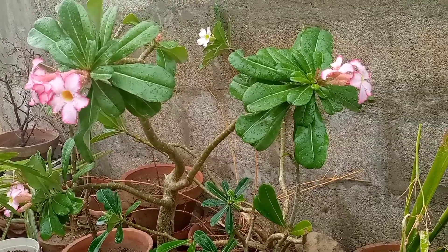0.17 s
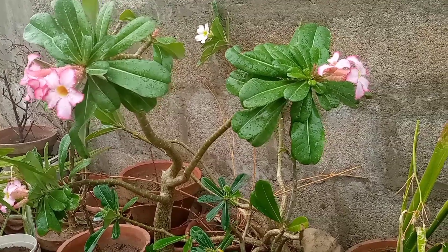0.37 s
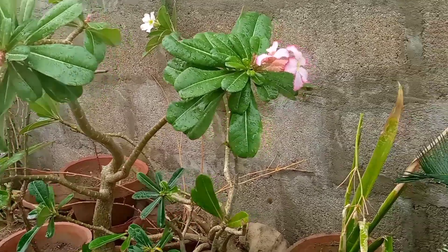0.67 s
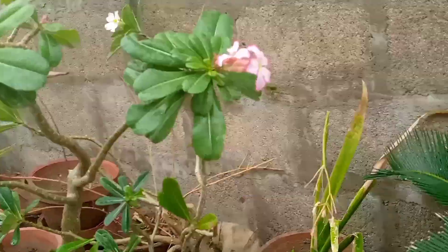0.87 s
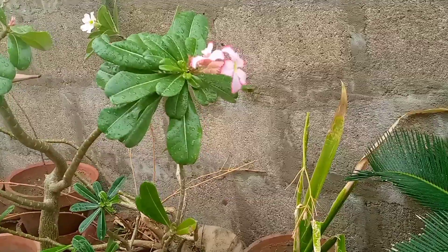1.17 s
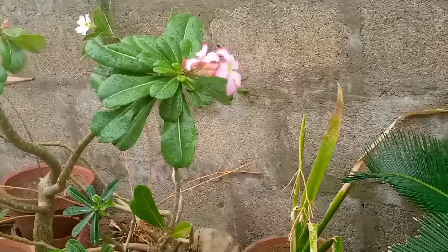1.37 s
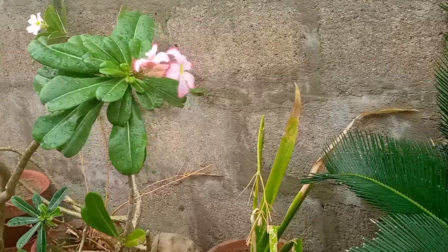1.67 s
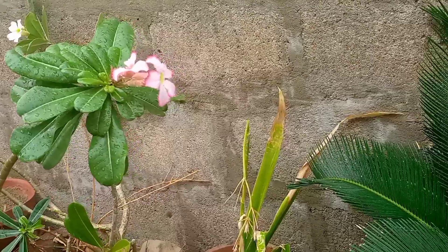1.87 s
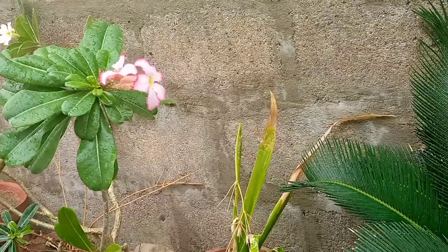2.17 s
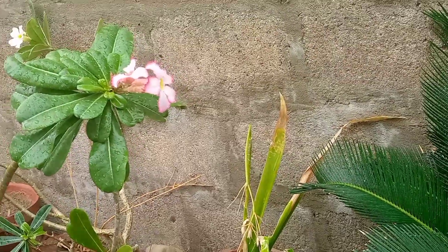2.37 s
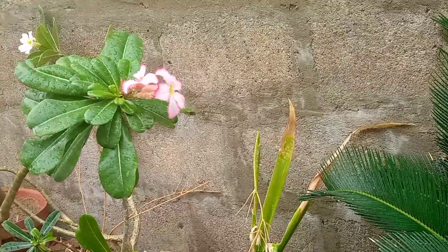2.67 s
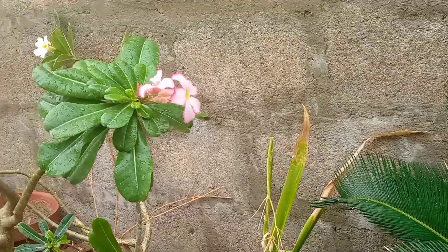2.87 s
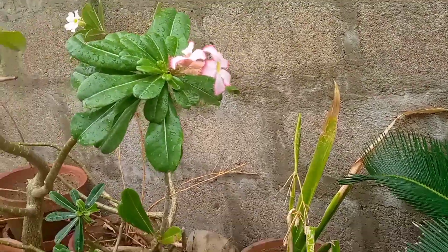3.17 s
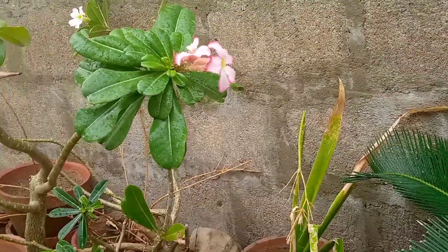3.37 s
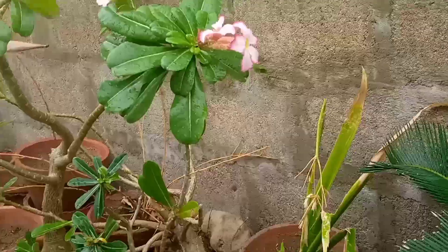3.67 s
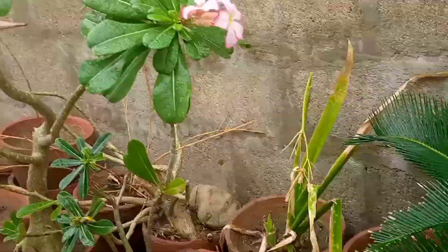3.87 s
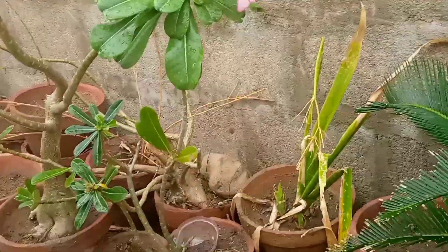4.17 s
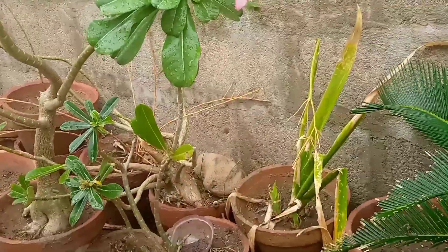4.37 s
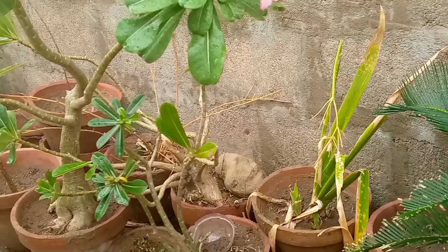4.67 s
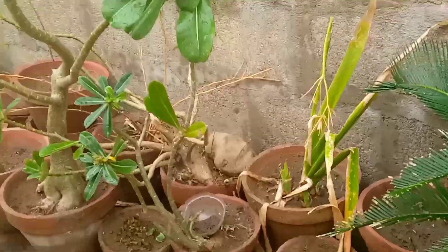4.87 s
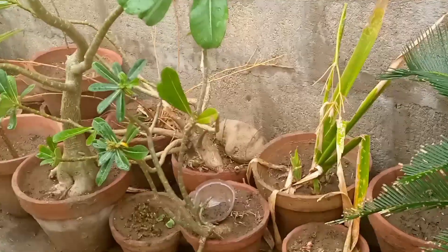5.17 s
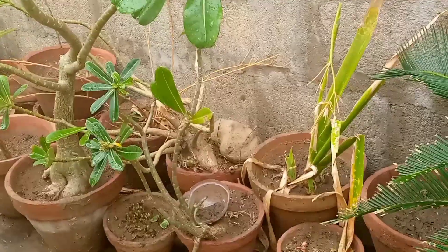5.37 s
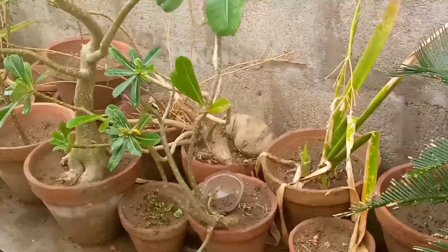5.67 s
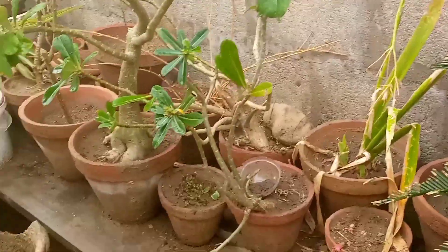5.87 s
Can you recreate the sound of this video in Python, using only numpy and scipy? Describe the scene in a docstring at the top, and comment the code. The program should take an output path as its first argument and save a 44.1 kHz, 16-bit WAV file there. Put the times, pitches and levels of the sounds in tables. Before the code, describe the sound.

In a walled courtyard of potted plants, a rooster gives short rough syllables and then one long sagging crow. Hoarse fowl squawks follow, with thin bird chirps. Small dry ticks sound near the microphone through the middle. A dog woofs once, then a second crow rises with another rooster overlapping it, its long last note still sounding at the end. Quiet hush and low rumble lie beneath.

```python
"""Roosters crow twice beyond the walls of a home courtyard, a second bird overlapping the later crow.
Each crow is a stack of harmonics on a rough, gliding pitch, echoing round the yard.
Pulses ring a throat for hoarse squawks; fluttering whistles make chirps, tonal streaks of squawks and
faint upper lines of the second crow; a falling voice makes one short woof of a dog. Small dry ticks of
ringing noise sound close by, over a quiet outdoor hush and a low rumble of filtered noise."""
import sys
import numpy as np
from scipy import signal
from scipy.fft import rfft, irfft, next_fast_len
from scipy.io import wavfile
from scipy.ndimage import uniform_filter1d

SR = 44100
rng = np.random.default_rng(int(sys.argv[2]) if len(sys.argv) > 2 else 0)


def wav_out(sig):
    """Save sig, one row per channel (or a flat mono array), as 16-bit PCM at SR to the path in sys.argv[1]."""
    wavfile.write(sys.argv[1], SR, np.round(np.clip(np.atleast_2d(sig).T, -1, 1) * 32767).astype(np.int16))


N = 265173
TIME = np.arange(N) / SR


def phrase(rooster, *held):
    """Slurs one rooster's notes together; the strongest note sets pitch and roughness."""
    # short crow syllables: t/s, length/s, start f/Hz, middle f/Hz, end f/Hz, harmonic 1 level/dB,
    # harmonic 2 level/dB, harmonic 3 level/dB, tilt over the syllable/dB, roughness (0-1), rooster
    syllables = [ (0.165, 0.12, 777, 829, 863, -43, -45, -59, -0.5, 0.57, "first"),
                 (0.369, 0.13, 882, 880, 850, -41, -44.5, -76, -7, 0.5, "first"),
                 (0.572, .075, 875, 857.6, 859.5, -43, -41, -65, 0, 0.26, "first"),
                 (0.678, 0.058, 840, 845, 821, -43, -56, -65, -1.5, 0.59, "first"),
                 (1.825, 0.12, 762, 754, 743.4, -36, -47.5, -62, 1.5, 0.11, "first"),
                 (1.992, .13, 694, 689, 628, -46, -56, -68, 5.5, 0.57, "first"),
                 (4.34, 0.12, 667, 631, 642.3, -48.5, -54, -51.5, 7, 0.54, "second"),
                 (4.51, 0.092, 671.3, 717.4, 790.5, -34.5, -40.5, -39.5, 7, 0.51, "second"),
                 (4.625, 0.038, 770, 730, 705, -35, -49, -52, -3.5, 0.45, "second"),
                 (4.678, 0.093, 723, 655.3, 636, -43.5, -59, -50, -6, 0.68, "second"),
                 (4.83, 0.071, 682.4, 714, 765, -40, -34, -40.5, 4, .5, "second"),
                 (4.941, .075, 699, 711, 748, -37, -36, -41, 2, 0.37, "second"),
                 (5.039, 0.054, 711, 701, 684, -33.5, -39, -48, -4.5, 0.52, "second"),
                 (5.142, 0.15, 686.4, 693.6, 616, -53, -47, -49.5, 3.5, 0.98, "second"),
                 (4.61, 0.21, 843.4, 845.7, 838.3, -35.5, -38, -41, -7.5, 0.62, "answer"),
                 (4.815, 0.16, 833.6, 828, 836, -35.5, -52, -52, -1, 0.77, "answer"),
                 (5.031, 0.22, 827, 801, 816, -38.5, -52.5, -67, -13, 0.9, "answer")]
    slur_s = .016
    notes = [syllable(*row[:-1]) for row in syllables if row[-1] == rooster] + list(held)
    hz, rough, levels_db = (np.array(control) for control in zip(*notes))
    lead = levels_db.max(1).argmax(0)
    lead_hz = hz[lead, np.arange(N)]
    lead_rough = np.clip(rough[lead], 0, 1)
    slur = lambda x: uniform_filter1d(x, int(slur_s * SR))
    return slur(lead_hz), slur(lead_rough), np.maximum(levels_db.max(0), -100)


def syllable(start, length, start_hz, middle_hz, end_hz, db1, db2, db3, tilt_db, rough):
    """Controls of a short harsh note: the pitch bends once while the level tilts."""
    progress = np.clip((TIME - start) / length, 0, 1)
    hz = np.interp(progress, [0, .5, 1], [start_hz, middle_hz, end_hz])
    level_db = swell_db(start, start + length) + tilt_db * (progress - .5)
    return hz, rough, np.add.outer([db1, db2, db3], level_db)


def long_note(hold, fading):
    """Controls of the held note: a scoop up to pitch, then a steady sag as the breath runs out."""
    scoop_s = .045  # time constant
    hz, scoop_hz, sag_hz_per_s, rough, third_db = hold
    start, end = fading[0][0], fading[-1][0]
    t = np.maximum(TIME - start, 0)
    db1, db2 = curves(fading)
    levels_db = np.array([db1, db2, db2 + third_db]) + swell_db(start, end)
    return hz - scoop_hz * np.exp(-t / scoop_s) - sag_hz_per_s * t, rough, levels_db


def swell_db(start, end):
    """Attack before a note's start, hold, release after its end, at the same speeds for every note."""
    attack_db_per_s, release_db_per_s = 375, 328.5
    attack_db = attack_db_per_s * np.maximum(start - TIME, 0)
    release_db = release_db_per_s * np.maximum(TIME - end, 0)
    return -attack_db - release_db


def crow(controls, upper, jitter, rasp, wet_db, upper_db, breath_db):
    """A stack of harmonics on a jittering pitch; the walls smear each glide."""
    press_db = 8  # the upper harmonics brighten by this much at full roughness
    hz, rough, levels_db = controls
    sounding = uniform_filter1d(1. * (levels_db.max(0) > -70), SR // 50)
    phase = 2 * np.pi * np.cumsum(hz * (1 + jitter * rough * wander(111.0))) / SR
    pressure = sounding * (1 + rasp * rough * wander(62))
    low = np.zeros(N)
    for k, db in enumerate(levels_db, 1):
        low += amp(db) * steady(yard(pressure * np.cos(k * phase), wet_db), 0.091)
    # weak upper harmonics and the breath of the harsh parts follow the overall effort
    effort_db = uniform_filter1d(np.mean(levels_db[:2], 0), SR // 8)
    high = np.zeros(N)
    for k in range(len(levels_db) + 1, 10):
        harmonic_db = effort_db + upper_db + press_db * rough + at_hz(upper, k * hz)
        high += amp(harmonic_db) * np.cos(k * phase)
    breath = amp(effort_db + breath_db) * rough * resonance(rng.standard_normal(N), 1990, 1400)
    return low * sounding + yard(pressure * (high + breath), wet_db=5)


def squawks(pulse_hz, jitter, breath):
    """Slow uneven pulses and turbulence ring a narrow throat."""
    # hoarse squawks: t/s, lower throat level/dB before its lift, upper throat level/dB
    calls = [
        [(0.0, -70, -56.5), (0.19, -58.5, -43), (0.32, -96, -63)],
        [(1.85, -91, -53), (2.144, -54, -45), (2.21, -54.5, -72), (2.24, -49.5, -43), (2.468, -62.5, -43),
         (2.75, -97, -65.5)],
    ]
    low_lift_db = 6
    # throat resonances, lower and upper: f/Hz, width/Hz, level/dB within the group
    throat_low = [(1291, 215, 0)]
    throat_high = [(1560, 190, -5), (1790, 220, -1), (1990, 130, 0), (1850, 1000, -6)]
    turns = np.cumsum(pulse_hz * (1 + jitter * wander(70))) / SR
    pulses = unit(np.diff(np.floor(turns), prepend=0))
    drive = pulses + breath * rng.standard_normal(N)

    def ring(throat):
        """Rings one group of throat resonances at an even level."""
        return steady(unit(sum(amp(db) * resonance(drive, hz, width) for hz, width, db in throat)), 0.05)

    low, high = ring(throat_low), ring(throat_high)
    out = np.zeros(N)
    for rows in calls:
        low_db, high_db = curves(rows)
        out += gate(rows) * (amp(low_db + low_lift_db) * low + amp(high_db) * high)
    return out


def whistled_lines(flutter_hz, side_db, far_side_db, near_above_db, twitter_per_s):
    """Fluttering whistles, the loud ones richer in overtones; more birds twitter faintly behind."""
    # whistled lines: t/s, length/s, start f/Hz, end f/Hz, level/dB rms, flutter (share of the pitch)
    # mostly chirps; the rows at 1.887, 5.795, 5.878 and 5.905 s are tonal streaks of hoarse fowl squawks,
    # those at 4.236 and 4.37 s upper harmonics of the second rooster's crow, as faint whistling lines
    lines = [ (0, 0.029, 6400, 5900, -50, 0.14), (.63, 0.099, 3370, 3790, -54, 0.096),
             (0.662, 0.077, 4550, 4480, -53, 0.013), (0.738, 0.076, 3450, 2805, -53.5, 0.066),
             (1.025, 0.033, 5830, 4920, -37, 0.034), (1.043, 0.02, 5565, 5620, -29.5, 0.037),
             (1.133, 0.024, 6430, 4650, -41, 0.058), (1.142, 0.068, 6990, 6450, -47, 0.066),
             (1.128, 0.1, 2975, 3130, -56.5, 0.024), (1.765, 0.072, 7350, 7220, -56, 0.016),
             (1.878, 0.12, 6350, 4320, -53, 0.11), (1.887, 0.17, 2012, 2024, -49.5, 0.017),
             (2.798, 0.087, 5860, 5760, -53.5, .02), (3.042, .09, 7200, 7000, -53, 0.03),
             (3.06, .07, 3600, 3150, -63, 0.023), (3.139, 0.056, 2550, 2680, -52.5, 0.042),
             (3.17, 0.084, 3250, 2900, -56.5, .03), (3.227, 0.074, 2554, 2453, -51.5, 0.029),
             (3.448, 0.026, 3150, 3060, -62, 0.013), (3.495, 0.046, 2570, 2570, -58.5, 0.031),
             (3.653, 0.052, 2850, 2700, -57.5, 0.026), (3.84, 0.12, 1556, 1624, -61, 0.03),
             (3.96, 0.056, 1860, 2330, -53, .04), (4.236, 0.15, 3146, 3187, -56, 0.019),
             (4.37, 0.13, 2504, 2488, -49, 0.025), (4.461, 0.037, 2710, 2795, -48.5, 0.034),
             (4.888, 0.063, 7436, 5850, -51, 0.1), (5.003, .1, 6990, 6700, -46.5, .08),
             (5.145, 0.075, 6060, 5750, -49, 0.067), (5.51, 0.065, 2853, 2890, -52, .03),
             (5.579, 0.07, 3086, 3110, -46.5, 0.014), (5.618, .13, 2656, 2806, -50.5, 0.04),
             (5.668, 0.075, 3215, 3110, -48, .02), (5.681, .08, 3600, 3555, -55, 0.019),
             (5.695, 0.028, 7770, 7240, -50.5, 0.016), (5.852, 0.1, 2750, 2325, -48.5, 0.11),
             (5.795, 0.11, 2055, 1962, -41, 0.045), (5.878, 0.086, 2000, 1861, -37, 0.071),
             (5.905, 0.11, 1906, 1777, -35, 0.034)]
    # faint far twitter: f/Hz, level/dB rms
    twitter = [(2300, -65), (3200, -65), (4500, -69), (6000, -65), (7500, -66)]
    out = np.zeros(N)
    for s, length, start_hz, end_hz, db, flutter in lines:
        overtone_db = side_db if db > near_above_db else far_side_db
        add(out, s, amp(db) * whistle(length, start_hz, end_hz, flutter, flutter_hz, overtone_db))
    lowest_hz, highest_hz = twitter[0][0], twitter[-1][0]
    for when, height, glide, span in rng.random((int(twitter_per_s * N / SR), 4)):
        hz = lowest_hz * (highest_hz / lowest_hz) ** height
        end_hz = hz * (.85 + 0.18 * glide)
        call = whistle(.02 + 0.064 * span, hz, end_hz, 0.044, flutter_hz, far_side_db)
        add(out, when * N / SR, amp(at_hz(twitter, hz)) * call)
    return out


def whistle(length, start_hz, end_hz, flutter, flutter_hz, side_db):
    """A gliding, fluttering whistle: the second harmonic of the syrinx leads, its neighbours are faint."""
    size = int(length * SR)
    hz = np.geomspace(start_hz, end_hz, size) * (1 + flutter * wander(flutter_hz, size))
    phase = np.pi * np.cumsum(hz) / SR  # the fundamental, an octave below the leading pitch
    sides = np.cos(phase) + np.cos(3 * phase) + np.cos(4 * phase) / 2
    voice = np.cos(2 * phase) + amp(side_db) * sides
    return unit(voice * signal.windows.tukey(size, .4))


def woof(jitter, mouth_width_hz, mouth_db, breath_db, dull_db):
    """A falling voice brightens with effort as the mouth opens; the throat shapes its harmonics."""
    # the woof: t/s, pitch f/Hz, level/dB, mouth resonance f/Hz
    bark = [(4.078, 383, -61, 720), (4.088, 371, -40.5, 746), (4.103, 333.7, -34, 670),
            (4.122, 319.7, -29, 1340), (4.136, 296, -34, 770), (4.15, 298, -38, 650),
            (4.165, 271, -61, 603)]
    # the dog's throat: f/Hz, level/dB
    throat = [(320, -12), (650, -10.5), (1000, -15.5), (1300, -12.5), (1600, -21), (1950, -13.5),
              (2600, -32), (3200, -23.5), (4500, -48)]
    hz, level_db, mouth_hz = curves(bark)
    phase = 2 * np.pi * np.cumsum(hz * (1 + jitter * wander(171))) / SR
    slack = 1 - amp(level_db - level_db.max())

    def shape_db(f):
        """Throat and mouth resonance, duller away from the mouth's pitch when effort is slack."""
        mouth = mouth_db / (1 + ((f - mouth_hz) / mouth_width_hz) ** 2)
        return at_hz(throat, f) + mouth + dull_db * slack * abs(np.log2(f / mouth_hz))

    voice = np.zeros(N)
    for k in range(1, 13):
        voice += amp(shape_db(k * hz)) * np.cos(k * phase + 2 * np.pi * rng.random())
    breath = unit(colour(rng.standard_normal(N), lambda f: amp(at_hz(throat, f))))
    return gate(bark, fade=.004) * amp(level_db) * (steady(voice, 0.012) + amp(breath_db) * breath)


def ticks(t60, width_hz, ring_db, snap_db, knock_db, faint_per_s, faint_db):
    """Dry ticks close by: a bright snap, a brief ring and a light knock, with faint crackle between."""
    # small ticks: t/s, level/dB before the trims of ring, snap and knock, ring f/Hz
    strikes = [(0.8066, -58, 7540), (1.9904, -48.5, 7570), (2.2127, -69, 7640), (2.7417, -48, 6700),
               (2.8417, -54, 9900), (2.9922, -40, 6200), (3.263, -46, 6700), (3.488, -44, 7000),
               (3.662, -45, 6560), (3.8316, -49.5, 6800), (4.119, -43.5, 6800), (4.3843, -50, 6960),
               (4.436, -46, 6300), (4.64, -45, 6600)]
    t, out = TIME[:2048], np.zeros(N)
    decay = amp(-60 * t / t60)
    for s, db, hz in strikes:
        parts = [(hz, width_hz, ring_db), (10500, 5000, snap_db), (1500, 1200, knock_db)]
        tick = np.zeros(len(t))
        for f, width, part_db in parts:
            tick += amp(db + part_db) * resonance(rng.standard_normal(len(t)), f, width)
        add(out, s, decay * tick)
    faint = (rng.random(N) < faint_per_s / SR) * np.minimum(rng.exponential(1, N), 3)
    bursts = signal.oaconvolve(faint, decay)[:N]
    return out + amp(faint_db) * bursts * resonance(rng.standard_normal(N), 6300, 7500)


def outdoors(hush_db, rumble_db, rumble_hz, rumble_width_hz, lumps_db):
    """A gently swelling hush above a lumpy rumble with a few soft bumps."""
    # spectrum of the hush: f/Hz, relative density/dB per Hz
    hush_spectrum = [(59, -28.5), (100, 1), (219, 1.5), (307, -5), (556, -4), (814, -7.5), (1860, -4.5),
                     (2720, -3), (3160, -13.5), (3820, -16.5), (6220, -8.5), (7220, -9), (8550, -31.5),
                     (12800, -33.5), (15800, -28)]
    # soft humps in the hush: f/Hz, width/Hz, level/dB rms before swelling
    humps = [(1720, 530, -63), (6100, 760, -71.5), (15000, 1000, -80)]
    # soft bumps in the rumble: t/s, rise/dB
    bumps = [(.27, 7), (1.25, 7), (1.79, 16), (3.72, 7), (4.0, 14), (4.34, 10), (5.28, 10)]
    swell_depth_db, hump_swell_db, swell_hz = .5, 2, 7  # swell_hz: about the fastest rate
    bump_s = 0.029  # standard deviation of each bump in time

    noise = rng.standard_normal(N)
    hush = amp(hush_db) * unit(colour(noise, lambda f: amp(at_hz(hush_spectrum, f))))
    for hz, width, db in humps:
        hush += amp(db + hump_swell_db * wander(swell_hz)) * resonance(rng.standard_normal(N), hz, width)

    def rumble_gain(f):
        """A hump at the rumble's pitch, with the treble cut."""
        hump = f ** 2 / (f ** 2 + rumble_hz ** 2) / np.hypot(1, 2 * (f - rumble_hz) / rumble_width_hz)
        return hump / (1 + (f / 170) ** 4)

    rumble = unit(colour(rng.standard_normal(N), rumble_gain))
    bumps_db = sum(db * np.exp(-.5 * ((TIME - s) / bump_s) ** 2) for s, db in bumps)
    level_db = rumble_db + bumps_db + lumps_db * wander(28.0)
    return hush * amp(swell_depth_db * wander(swell_hz)) + amp(level_db) * steady(rumble, 0.17)


def yard(x, wet_db):
    """Direct sound plus wall echoes: sparse taps whose treble dies first."""
    # echo of the yard: f/Hz, t60/s
    decay_times = [(300, 0.57), (1500, 0.43), (3500, 0.38), (6000, 0.35), (12000, 0.032)]
    size, taps_per_s, first_echo_s = SR * 3 // 4, 2000, .004
    signs = rng.choice([-1., 1.], size)
    taps = signs * (rng.random(size) < taps_per_s / SR) * (TIME[:size] > first_echo_s)
    hz, t, z = signal.stft(taps, SR, nperseg=256)
    decay = amp(-60 * t / at_hz(decay_times, hz)[:, None])
    tail = signal.istft(z * decay, SR, nperseg=256)[1]
    echo = signal.oaconvolve(x, tail / np.linalg.norm(tail))[:N]
    return (x + amp(wet_db) * echo) / np.hypot(1, amp(wet_db))


def amp(db):
    """Decibels to gain."""
    return 10 ** (np.asarray(db) / 20)


def unit(x):
    """Scales to rms 1."""
    return x / np.sqrt(np.mean(abs(x) ** 2) + 1e-20)


def at_hz(points, hz):
    """Reads a spectrum on a log-frequency axis."""
    f, value = np.transpose(points)
    return np.interp(np.log(hz + 1), np.log(f), value)


def curves(rows):
    """The columns of a table, sample by sample."""
    s, *columns = np.transpose(rows)
    return [np.interp(TIME, s, c) for c in columns]


def gate(rows, fade=0.045):
    """One while a table lasts, with soft ends."""
    start, end = rows[0][0], rows[-1][0]
    return np.interp(TIME, [start - fade, start, end, end + fade], [0, 1, 1, 0])


def colour(x, gain):
    """Filters by a gain given as a function of frequency."""
    size = next_fast_len(len(x))
    return irfft(rfft(x, size) * gain(np.fft.rfftfreq(size, 1 / SR)), size)[:len(x)]


def resonance(x, hz, width):
    """A steep-sided resonance, output at rms 1."""
    return unit(colour(x, lambda f: 1 / (1 + (2 * (f - hz) / width) ** 4)))


def wander(rate_hz, size=N):
    """Smooth chance at rms 1, slower than about a given rate."""
    return unit(colour(rng.standard_normal(size), lambda f: 1 / (1 + (f / rate_hz) ** 4)))


def steady(x, span):
    """Holds the power of a sound near 1 over spans of some seconds."""
    return x / np.sqrt(abs(uniform_filter1d(abs(x) ** 2, int(span * SR) + 1)) + 1e-3)


def add(mix, s, sound):
    """Mixes a sound in at time s."""
    start = round(s * SR)
    sound = sound[max(-start, 0):]
    part = mix[max(start, 0):][:len(sound)]
    part += sound[:len(part)]


def scene():
    """All the voices of the yard, in mono."""
    # upper harmonics: f/Hz, level/dB relative to the mean of the lowest two, before upper_db and roughness
    first_upper = [(2400, -30), (3200, -34), (3480, -16), (3900, -34), (5350, -38), (5680, -23),
                   (6400, -30), (7000, -40)]
    second_upper = [(2500, -8), (2800, -17), (3300, -23), (3550, -14), (3900, -30), (6300, -27),
                    (7000, -38)]
    # long clear notes: pitch f/Hz, scoop/Hz, sag/Hz per s, roughness (0-1),
    # harmonic 3 level/dB relative to harmonic 2
    first_hold = (835, 0, 59, .08, -32)
    second_hold = (707, 60, 31, .1, -19)
    # harmonics of the long notes fading in and out: t/s, harmonic 1 level/dB, harmonic 2 level/dB
    first_fading = [(0.8, -81, -47.5), (0.88, -38.5, -30), (0.944, -56.5, -31.5), (1.002, -38.5, -45.5),
                    (1.056, -41.5, -32.5), (1.138, -43.5, -60), (1.172, -47, -39.5), (1.26, -41, -41.5),
                    (1.32, -46.5, -28.5), (1.378, -56, -44.5), (1.418, -42.5, -43.5), (1.498, -38, -30.5),
                    (1.542, -53, -47.5), (1.78, -58, -44.5)]
    second_fading = [(5.3, -63.5, -44.5), (5.418, -40.5, -34), (5.586, -64, -35.5), (5.714, -38.5, -35.5),
                     (5.836, -36, -41.5), (5.862, -47, -51.5), (5.988, -36.5, -47), (6.01, -43.5, -47)]

    first = crow(phrase("first", long_note(first_hold, first_fading)), first_upper,
                 jitter=.04, rasp=.55, wet_db=-7, upper_db=-3, breath_db=-15)
    second = crow(phrase("second", long_note(second_hold, second_fading)), second_upper,
                  jitter=.02, rasp=1.0, wet_db=-10, upper_db=-7.5, breath_db=-9.5)
    answer = crow(phrase("answer"), first_upper,
                  jitter=.011, rasp=.5, wet_db=-7, upper_db=-6, breath_db=-10)
    roosters = yard(amp(1.16) * first + amp(0.3) * second + amp(-3.0) * answer, wet_db=-15)
    fowl = yard(squawks(pulse_hz=155, jitter=.035, breath=.18), wet_db=-3)
    bird_calls = yard(whistled_lines(flutter_hz=303, side_db=-19.0, far_side_db=-25.5,
                                     near_above_db=-41, twitter_per_s=24), wet_db=-4)
    dog = yard(woof(jitter=0.016, mouth_width_hz=60, mouth_db=11.5, breath_db=-18, dull_db=-7.0), wet_db=-16)
    near = yard(ticks(t60=.036, width_hz=1900, ring_db=-.5, snap_db=-13.5, knock_db=-8.5,
                      faint_per_s=30, faint_db=-65), wet_db=-14)
    air = outdoors(hush_db=-55.9, rumble_db=-64, rumble_hz=62, rumble_width_hz=16, lumps_db=2.3)
    return (roosters + fowl + bird_calls + dog + near + air)[None]


def record(dry):
    """The recorder's band limit: a steep linear-phase low-pass."""
    edge_hz = 15850
    lowpass = signal.firwin(511, edge_hz, window=("kaiser", 9), fs=SR)
    return signal.oaconvolve(dry, lowpass[None], "same")


dry = scene()
out = record(dry)
wav_out(out)
```